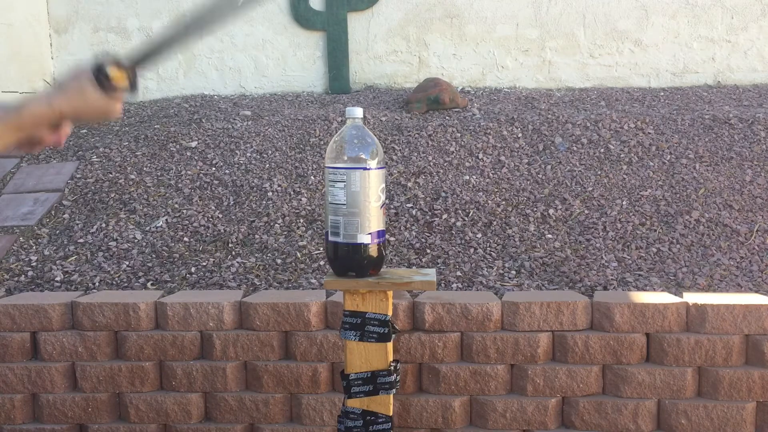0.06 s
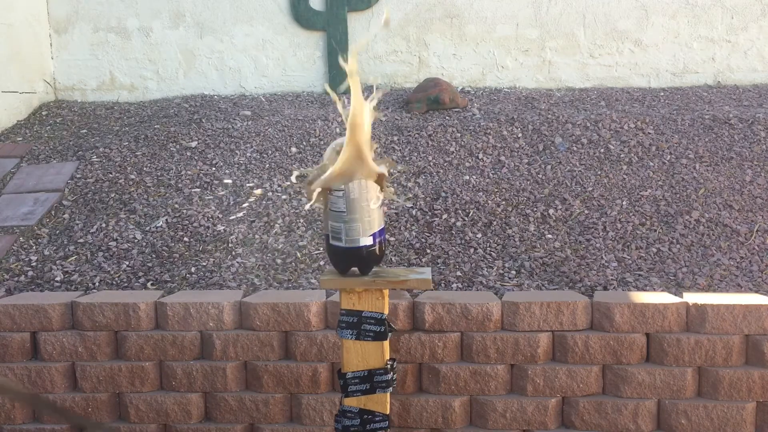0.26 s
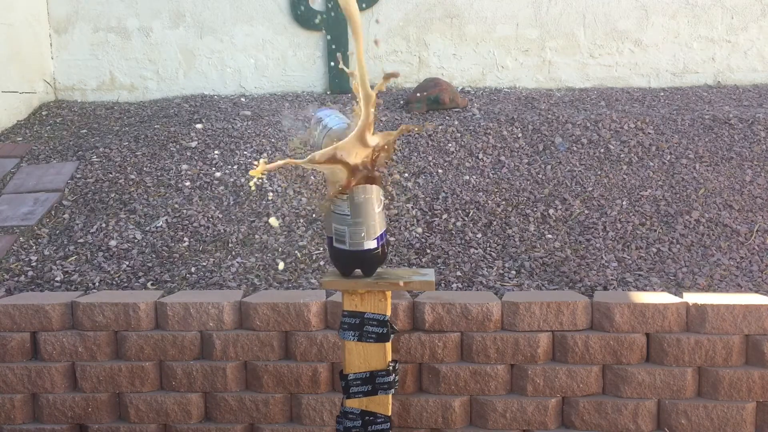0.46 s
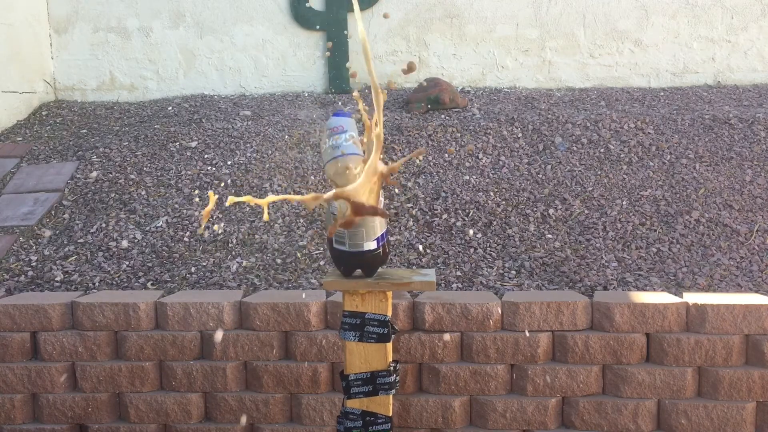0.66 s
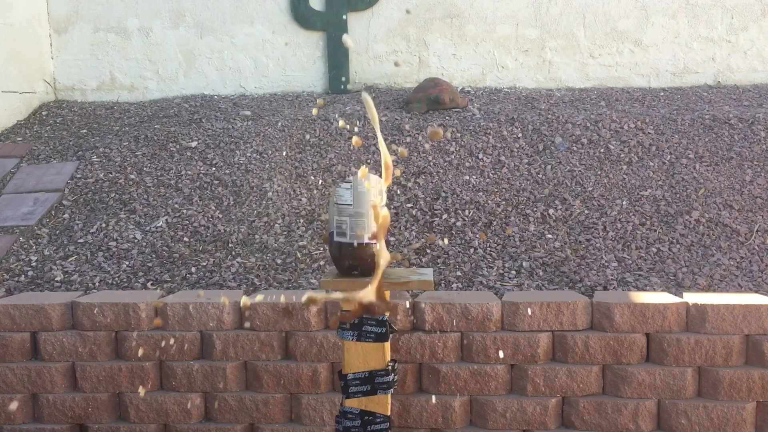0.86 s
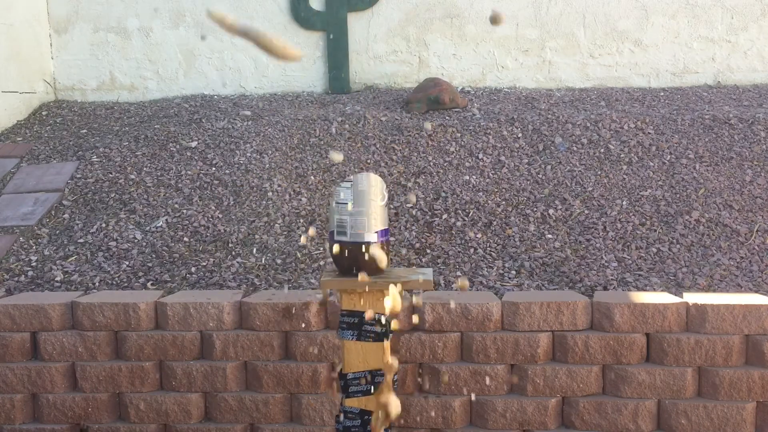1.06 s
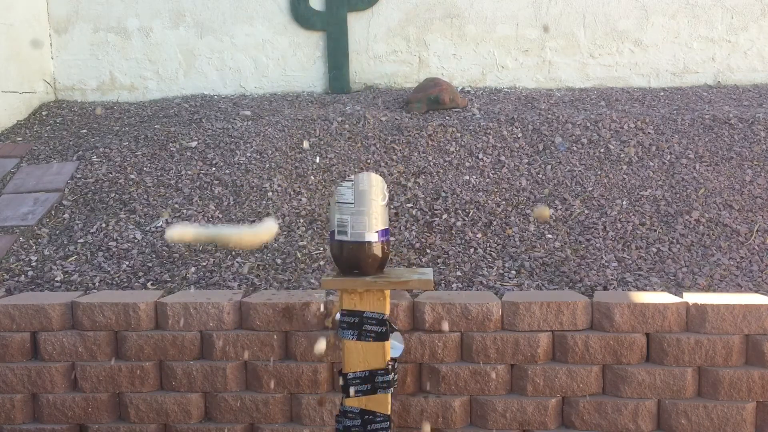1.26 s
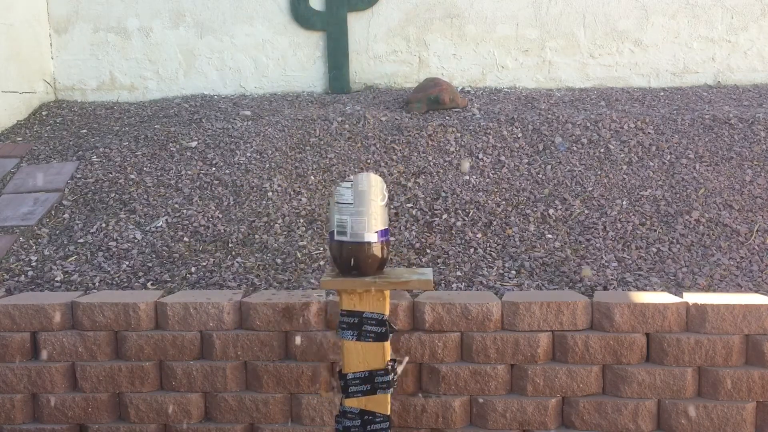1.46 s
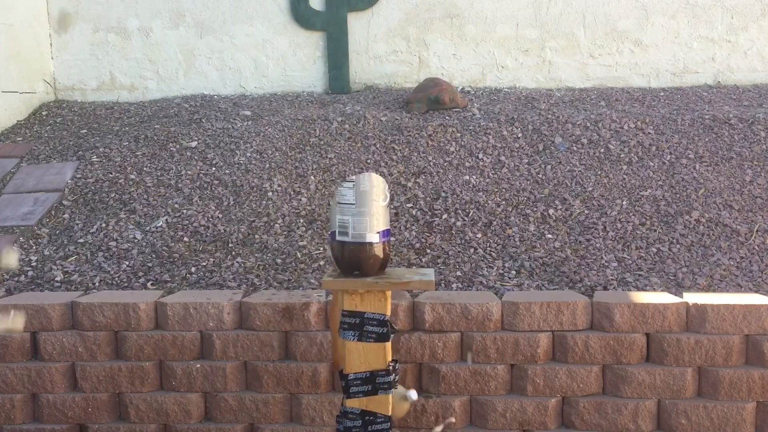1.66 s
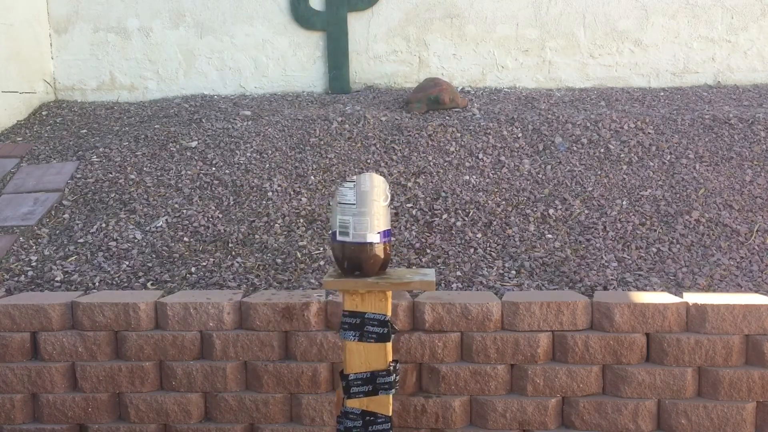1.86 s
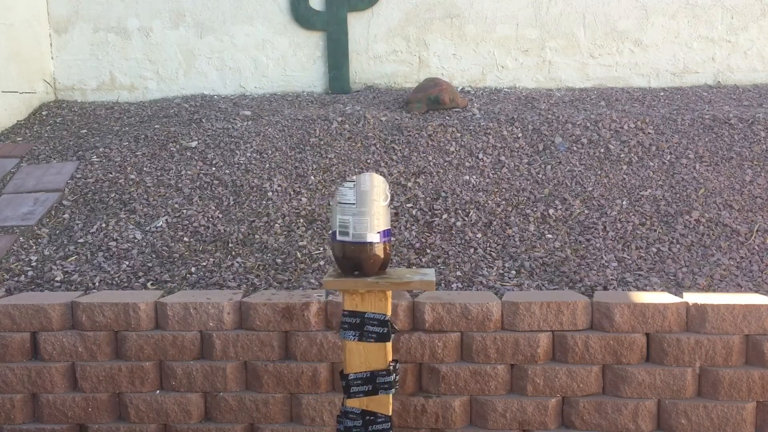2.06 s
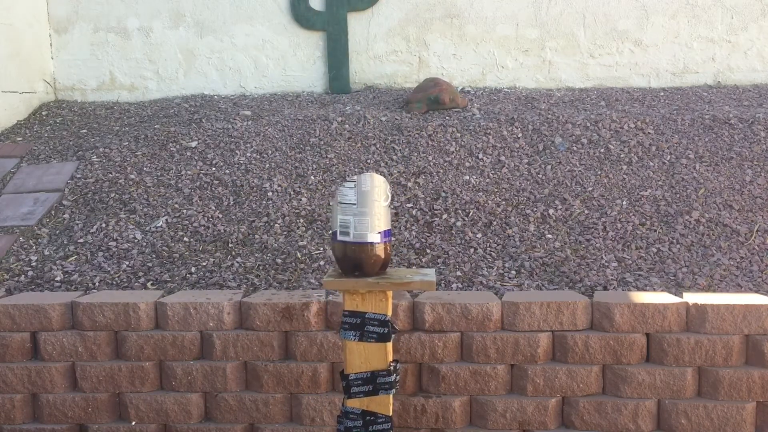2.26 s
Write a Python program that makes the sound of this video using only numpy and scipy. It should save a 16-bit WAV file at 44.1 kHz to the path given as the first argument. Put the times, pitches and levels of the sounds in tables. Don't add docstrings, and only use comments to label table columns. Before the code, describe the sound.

A plastic bottle is slashed open: short swish, tearing crack and deep boom, echoing off yard walls. Then liquid splashes and patters while the hollow top knocks and rocks on hard ground; slowed, dull outdoor sound.

```python
import sys
import numpy as np
from scipy import signal
from scipy.fft import rfft, irfft
from scipy.io import wavfile

SR = 44100
rng = np.random.default_rng(int(sys.argv[2]) if len(sys.argv) > 2 else 0)


def generate_wav(sig):
    pcm = np.round(np.clip(np.atleast_2d(sig).T, -1, 1) * 32767).astype(np.int16)
    wavfile.write(sys.argv[1], SR, pcm)


def volts_from_db(level):
    exponent = np.asarray(level, float) / 20
    return 10 ** exponent


N = 101429


def fade(t, t60):
    return np.exp(-np.log(1000) * t / t60)


def filtered(x, hz, kind, order):
    return signal.sosfilt(signal.butter(order, hz, kind, fs=SR, output="sos"), x)


def band(x, hz, octaves, order=2):
    edges = np.clip(hz * 2.0 ** (np.array([-0.5, 0.5]) * octaves), 15, 0.45 * SR)
    return filtered(x, edges, "band", order)


def unit(x):
    return x / np.sqrt(np.mean(x ** 2))


def add(out, x, s):
    i = int(s * SR)
    out[i:i + len(x)] += x[:len(out) - i]


def lumps(size, step_s):
    k = max(int(step_s * SR), 1)
    return np.repeat(rng.standard_normal(size // k + 1), k)[:size]


def puff(attack, t60, hz, octaves, grit_db):
    t = np.arange(int(0.4 * SR)) / SR
    crackle = rng.standard_normal(len(t)) * volts_from_db(grit_db * lumps(len(t), 0.0006))
    swell = np.minimum(t / attack, 1) ** 2
    return unit(band(crackle, hz, octaves)) * swell * fade(np.maximum(t - attack, 0), t60)


def ring(hz, t60):
    t = np.arange(int(0.45 * SR)) / SR
    return np.sin(2 * np.pi * hz * t) * fade(t, t60)


def air():
    # (f/Hz, level/dB)
    air_colour = [(15, -42), (25, -17), (65, 0.5), (301, -13.5), (1010, -25.5), (2050, -32.5),
                  (9000, -45.5), (11700, -72), (19800, -120)]
    hz = np.maximum(np.fft.rfftfreq(N, 1 / SR), 10)
    table = np.array(air_colour)
    colour = volts_from_db(np.interp(np.log(hz), np.log(table[:, 0]), table[:, 1]))
    hiss = unit(irfft(rfft(rng.standard_normal(N)) * colour, N))
    rumble = unit(band(rng.standard_normal(N), 46.3, 2.73))
    return volts_from_db(-53) * hiss + volts_from_db(-53.5) * rumble


def yard():
    # (f/Hz, early level/dB, early t60/s, late level/dB, late t60/s)
    echo_bands = [(43, -15, 0.49, -14, 2.22), (71.8, -9, 0.19, -14, 1.71), (138, -17.5, 0.14, -22, 1.2),
                  (191.6, -21, 0.13, -22.5, 1.85), (420, -4.5, 0.26, -20.5, 1.32),
                  (700, -11.5, 0.49, -31.5, 2.38), (1400, -15, 0.53, -30.5, 2.2),
                  (2580, -12.5, 0.35, -26.5, 1.24), (4120, -25, 0.59, -35.5, 0.46),
                  (6750, -25.5, 0.43, -50.5, 0.58)]
    t = np.arange(N) / SR
    out = np.zeros(N)
    for hz, early_db, early_t60, late_db, late_t60 in echo_bands:
        noise = rng.standard_normal(N) * volts_from_db(1.3 * lumps(N, 0.015))
        decay = volts_from_db(early_db) * fade(t, early_t60) + volts_from_db(late_db) * fade(t, late_t60)
        out += unit(band(noise, hz, 0.96, order=3)) * decay
    gap_s = 0.042
    return out * np.clip(t / gap_s, 0, 1) ** 2


def walls():
    gap_s, bright_t60_s, dull_t60_s, dull_hz = 0.0067, 0.61, 1.32, 1540
    t = np.arange(N) / SR
    bright, dull = rng.standard_normal((2, N))
    dull = filtered(dull, dull_hz, "low", 1)
    decay = 0.6 * bright * fade(t, bright_t60_s) + dull * fade(t, dull_t60_s)
    return np.clip(t / gap_s, 0, 1) ** 2 * volts_from_db(1.8 * lumps(N, 0.014)) * decay


def rolls():
    # (t/s, level/dB, f/Hz, length/s)
    swells = [(0.359, -14.5, 44.54, .12), (.36, -20, 95, 0.069), (0.411, -12, 41.1, 0.059),
              (0.499, -35, 67, 0.057), (0.549, -23.5, 46.7, 0.061), (0.597, -33, 82.7, 0.068),
              (0.636, -26.5, 44.1, 0.11), (0.701, -25.5, 71, 0.036), (0.729, -33.5, 87, 0.06),
              (0.823, -35.5, 60.6, 0.079), (0.894, -40, 66.7, .07), (.985, -41.5, 164, 0.042),
              (1.024, -36.5, 68.7, 0.053), (1.254, -35, 109, 0.066), (1.99, -33, 75, 0.033)]
    out = np.zeros(N)
    for s, db, hz, length in swells:
        t = np.arange(int(length * SR)) / SR
        swell = np.sin(np.pi * t / length) ** 2
        add(out, volts_from_db(db) * swell * np.sin(2 * np.pi * hz * t), s)
    return out


def splashes():
    # (t/s, level/dB, brightness factor, t60/s)
    first_splashes = [(0.711, -52, 0.87, 0.024), (0.7225, -50, 0.66, 0.03), (.797, -51.5, 0.91, .025),
                      (0.8097, -45.5, 1.4, 0.025), (0.8373, -32.5, 0.62, 0.048),
                      (0.938, -39.5, 0.68, 0.071), (0.9783, -43.5, 0.37, 0.17),
                      (1.0148, -31.5, 0.63, 0.021), (1.0618, -54, 0.75, 0.06), (1.0914, -34, 0.43, 0.034),
                      (1.2391, -19, 0.39, 0.037), (1.2583, -18.5, 0.32, 0.07), (1.277, -41, 1.3, 0.03),
                      (1.2895, -17.5, 0.17, 0.054), (1.349, -41.5, 1.2, 0.11), (1.3937, -25, 0.18, 0.043),
                      (1.4462, -33.5, 1.01, 0.097), (1.4618, -22.5, 0.22, 0.17), (1.472, -51, 1.9, 0.15),
                      (1.507, -15, 0.83, 0.041), (1.5129, -17, 0.74, 0.06), (1.5275, -22, 0.84, 0.086),
                      (1.5514, -18, 0.69, 0.088), (1.5584, -15, 0.47, 0.054), (1.5796, -31.5, 1.2, 0.03),
                      (1.5933, -19.5, 0.67, 0.032), (1.6505, -22, 0.6, 0.03), (1.6651, -30, 0.72, 0.028),
                      (1.7042, -23, 0.9, 0.051), (1.73, -18.5, 0.59, 0.052), (1.77, -38, 1.3, 0.046)]
    late_splashes = [(1.8238, -47, 0.73, 0.097), (1.8913, -32, 0.77, 0.078), (1.9121, -26.5, 0.89, 0.099),
                     (1.9495, -22.5, 0.73, 0.058), (1.96, -29, 1, 0.064), (1.9862, -11, 0.61, 0.13),
                     (2.0203, -15, 0.27, 0.063), (2.0274, -32, 0.62, 0.06), (2.048, -24, 0.53, 0.044),
                     (2.0933, -32, 0.32, 0.54), (2.1234, -22, 0.34, 0.11), (2.201, -32, 0.37, 0.32),
                     (2.2455, -25.5, 0.49, 0.17), (2.269, -33, 2.8, 0.03)]
    out = np.zeros(N)
    for s, db, brightness, t60 in list(first_splashes) + list(late_splashes):
        splash = puff(0.0041, t60, 3000 * brightness, 3.3, grit_db=4.2)
        add(out, volts_from_db(db - 12) * splash, s - 0.0025)
    return out


def drops():
    # (t/s, level/dB, f/Hz, t60/s)
    short_tones = [(.766, -40, 500, .06), (.863, -39, 650, .04), (.985, -39, 540, .06),
                   (1.157, -45, 1730, .015), (1.181, -38, 2130, .02), (1.2405, -17, 830, .04),
                   (1.2595, -14, 860, .05), (1.2665, -15, 930, .035), (1.4642, -19, 1300, .004),
                   (1.515, -26, 4600, .01), (1.554, -25, 1150, .04), (1.688, -31, 2300, .015),
                   (1.712, -35, 1100, .03), (1.7178, -20, 1200, .005), (1.791, -30, 2000, .005),
                   (1.871, -31, 2500, .02), (1.9125, -24, 4500, .008), (1.989, -15, 1120, .06),
                   (2.033, -21, 765, .11), (2.124, -31, 3100, .012)]
    out = np.zeros(N)
    for s, db, hz, t60 in short_tones:
        add(out, volts_from_db(db) * ring(hz, t60), s)
    return out


def patter():
    # (t/s, level/dB)
    spray_level = [(0, -83), (.6, -69), (0.719, -67.5), (.8, -63.5), (.9, -58), (1.352, -55), (1.519, -39),
                   (1.63, -53.5), (1.749, -40.5), (1.85, -47), (2.049, -48), (2.3, -44.5)]
    drops_per_s, tick_s = 590, 0.0013
    grains = (rng.random(N) < drops_per_s / SR).astype(float)
    tail = np.exp(-np.arange(400) / SR / tick_s)
    strength = np.convolve(grains, tail)[:N] + 0.23
    spray = unit(band(strength * rng.standard_normal(N), 1400, 3.9))
    return spray * volts_from_db(np.interp(np.arange(N) / SR, *np.array(spray_level).T))


def rocking():
    # (t/s, level/dB, f/Hz, t60/s)
    touches = [(0.864, -36, 196, 0.055), (0.983, -35.5, 277, 0.12), (1.211, -44.5, 304, 0.16),
               (1.299, -15, 297, 0.05), (1.324, -20, 302, .06), (1.337, -25, 336, 0.035),
               (1.357, -19, 426, 0.033), (1.391, -32, 310, 0.036), (1.403, -22.5, 525, 0.058),
               (1.409, -24, 294, 0.14), (1.437, -28, 313, 0.06), (1.438, -32, 652, 0.11),
               (1.46, -27, 333, 0.036), (1.483, -31, 302, 0.081), (1.504, -24, 363, 0.034),
               (1.515, -26.5, 562, 0.045), (1.523, -20, 352.5, 0.032), (1.542, -20.5, 308, .04),
               (1.578, -24, 377, 0.04), (1.595, -26.5, 402, 0.055), (1.619, -42, 370, 0.085),
               (1.677, -35.5, 401, 0.16), (1.714, -36.5, 307, 0.19), (1.752, -33, 330, 0.039),
               (2.014, -17, 324, 0.034), (2.022, -30, 780, .03), (2.029, -16, 300, 0.036),
               (2.05, -16.5, 320, 0.048), (2.068, -15.5, 346, 0.051), (2.09, -21.5, 584, 0.037),
               (2.106, -14, 316, 0.041), (2.153, -19, 320, 0.05), (2.168, -25.5, 700, 0.039),
               (2.172, -32, 327, .04), (2.183, -27.5, 588, .04), (2.187, -17, 320, 0.024),
               (2.205, -27, 293, 0.043), (2.267, -26.5, 300, 0.071), (2.284, -32, 1090, .04),
               (2.293, -22.5, 513, .04)]
    rise_s, overtone, overtone_db = 0.002, 2.3, -14
    out = np.zeros(N)
    for s, db, hz, t60 in touches:
        tone = ring(hz, t60) + volts_from_db(overtone_db) * ring(hz * overtone, t60 / 2)
        rise = np.minimum(np.arange(len(tone)) / SR / rise_s, 1)
        add(out, volts_from_db(db) * tone * rise, s)
    return out


def knocks():
    # (f/Hz, level/dB, t60/s)
    shell_tones = [(300.9, 4, 0.085), (353.6, -18, 0.1), (560, -18, 0.03), (800, -10, 0.04),
                   (900, -10, .04), (1150, -12, 0.04), (1400, -12, 0.025)]
    # (t/s, level/dB, contact/s, pitch factor)
    bounces = [(0.982, -46, 0.00066, 0.83), (1.2409, -8, 0.00047, 1.35), (1.2433, -0.5, 0.0011, 1.096),
               (1.2591, -24, 0.0009, 0.94), (1.2632, -1.5, 0.00063, 1.087), (1.2796, -22.5, .0004, 1.05),
               (1.31, -20, 0.00066, 2.14), (1.375, -23.5, 0.001, 1.03), (1.393, -22.5, 0.00048, 1.2),
               (1.558, -25.5, 0.00073, 2), (1.968, -26, 0.00041, 0.96), (1.9886, -5.5, 0.00016, 1.4),
               (1.9903, 3.5, 0.00076, 0.993), (1.9972, -18, 0.0012, 0.93), (2.007, -13, 0.00076, 1.93),
               (2.035, -19, 0.00055, 2.24), (2.136, -16.5, 0.0013, 1.13)]
    out = np.zeros(N)
    for s, db, contact, pitch in bounces:
        body = 0
        for hz, tone_db, t60 in shell_tones:
            spot_db = 1.2 * rng.standard_normal()
            body = body + volts_from_db(tone_db + spot_db) * ring(hz * pitch, t60)
        push = np.sin(np.pi * np.clip(np.arange(200) / SR / contact, 0, 1)) ** 2
        add(out, volts_from_db(db - 5) * signal.fftconvolve(body, push / push.sum()), s)
    return filtered(out, 185, "high", 2)


def burst():
    # (t/s, level/dB, attack/s, t60/s, f/Hz)
    noisy_parts = [(0.108, -37.5, 0.12, 0.041, 329), (0.119, -52, 0.059, 0.062, 1400),
                   (.186, -42, 0.0022, 0.16, 2620), (0.21, -38, 0.019, .02, 975),
                   (0.2304, -6, 0.0015, 0.036, 1070), (0.2304, -8, 0.0064, 0.082, 2830),
                   (0.241, -5.5, 0.0017, 0.045, 700), (0.253, -12, 0.0019, 0.17, 700),
                   (0.254, -24, 0.0026, 0.21, 2800), (0.669, -44.5, 0.023, 0.26, 900)]
    # (t/s, level/dB, f/Hz, t60/s)
    boom_tones = [(0.2202, -21.5, 272, 0.082), (0.2239, -18, 270, 0.012), (0.2317, -1, 700, 0.0091),
                  (0.2425, -0.5, 83.3, 0.071), (0.245, -12, 138, 0.31), (0.2552, -2, 193, 0.0099),
                  (.25, -14, 251.4, 0.27), (0.262, -5.5, 44.9, 0.35), (.219, -30, 1620, .1),
                  (0.229, -16, 130, .03), (0.242, -23, 1040, 0.042), (0.261, -8.5, 910, 0.032)]
    out = np.zeros(N)
    for s, db, attack, t60, hz in noisy_parts:
        add(out, volts_from_db(db) * puff(attack, t60, hz, 1.85, grit_db=2.5), s)
    for s, db, hz, t60 in boom_tones:
        add(out, volts_from_db(db) * ring(hz, t60), s)
    return out


def scene():
    blast_s = 0.232
    top = knocks()
    liquid = splashes() + drops() + patter()
    out = air() + rolls() + liquid + rocking() + top + burst()
    add(out, volts_from_db(-9) * yard(), blast_s)
    thin_top = filtered(top, 484, "high", 1)
    to_walls = volts_from_db(-46) * thin_top + volts_from_db(-43) * liquid
    out = out + signal.fftconvolve(to_walls, walls())[:N]
    return out[None]


def top_cut(x):
    return signal.sosfilt(signal.butter(12, 10440, fs=SR, output="sos"), x)


def record(dry):
    rounded = 0.97 * np.tanh(dry / 0.9)
    cut = signal.ellip(10, 0.2, 75, 9350, fs=SR, output="sos")
    mix = signal.sosfilt(cut, rounded)
    return top_cut(mix)


dry = scene()
out = record(dry)
generate_wav(out)
```